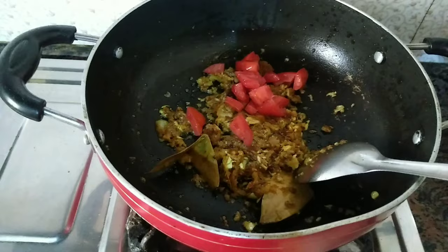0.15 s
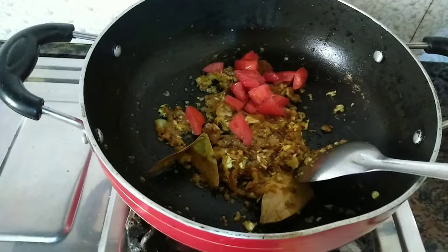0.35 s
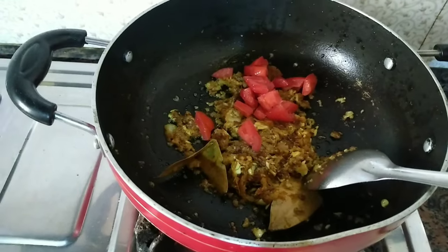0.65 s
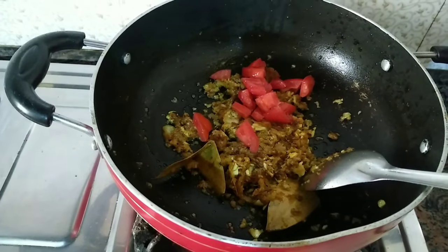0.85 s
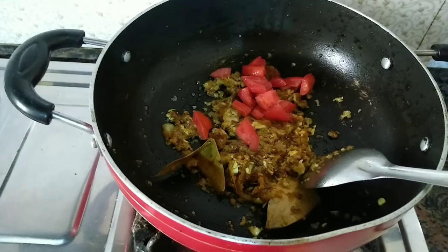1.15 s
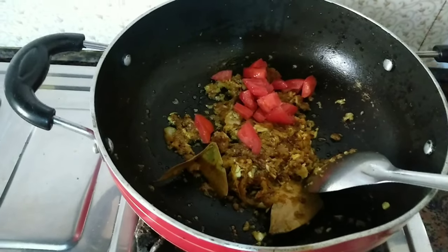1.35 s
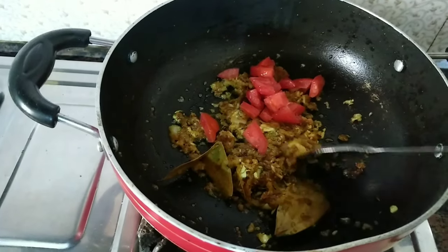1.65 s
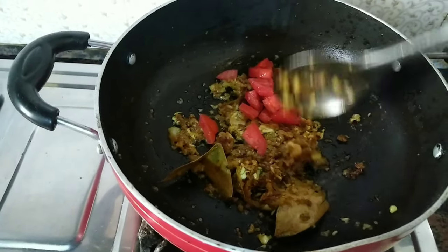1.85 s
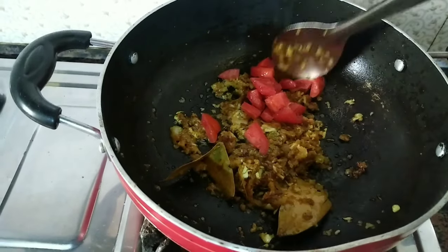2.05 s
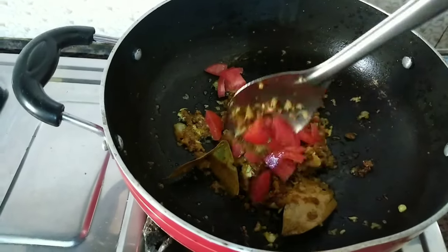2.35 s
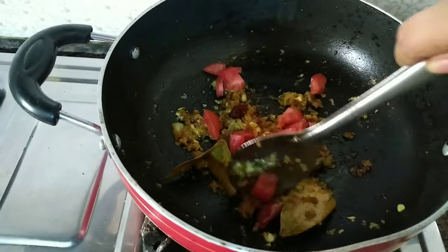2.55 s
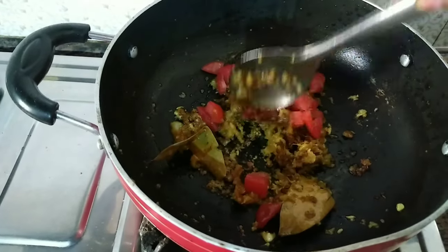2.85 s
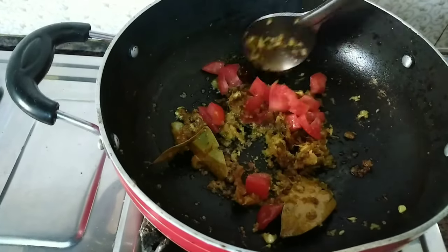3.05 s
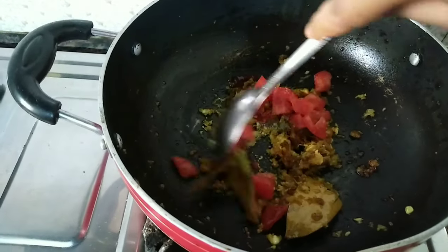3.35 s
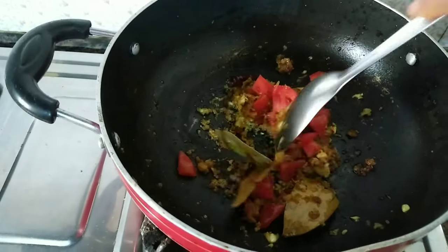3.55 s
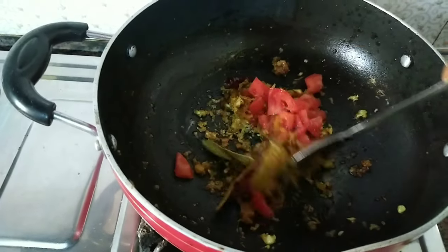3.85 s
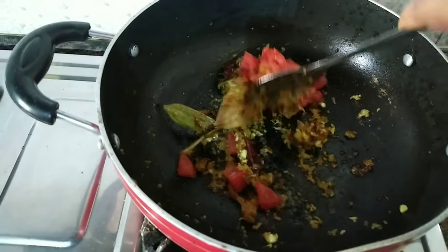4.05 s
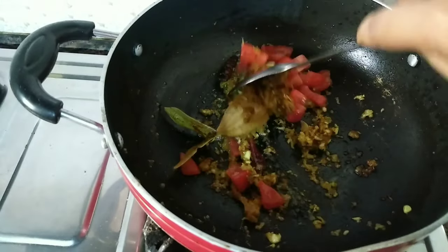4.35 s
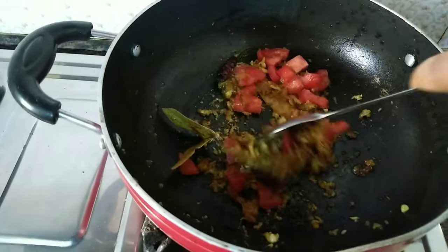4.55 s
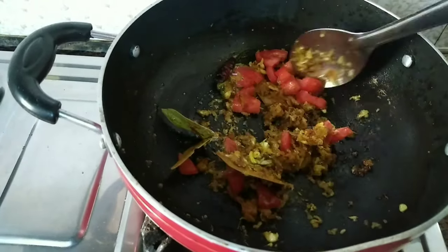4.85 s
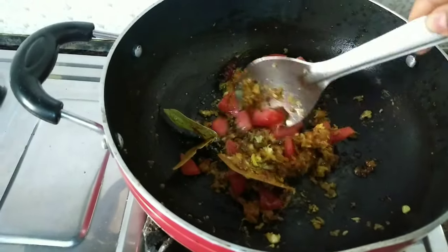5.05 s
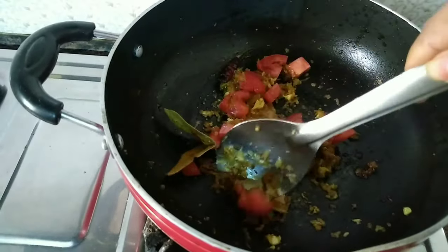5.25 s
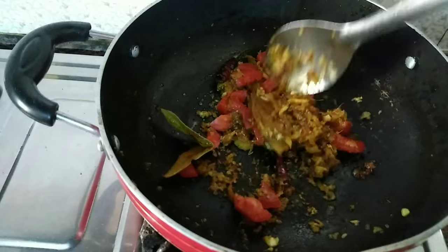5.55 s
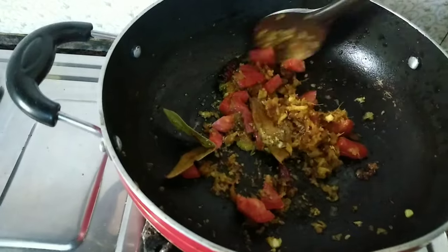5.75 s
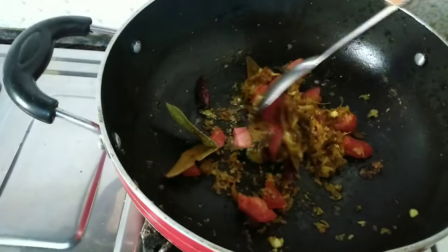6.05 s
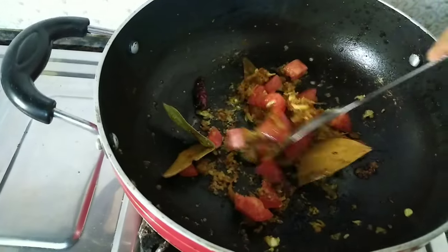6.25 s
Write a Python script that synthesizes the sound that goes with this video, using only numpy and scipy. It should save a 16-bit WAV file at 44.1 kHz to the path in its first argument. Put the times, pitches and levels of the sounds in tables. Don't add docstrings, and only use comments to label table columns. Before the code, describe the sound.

Close phone capture in a small kitchen. A steel spoon knocks a coated pan twice right away, sharp and ringing, over bright open sizzling with fine crackle. A small clink follows, then light scraping and soft pushes into the paste as the sizzle drops to a muffled near-hush. Past four seconds loud oil pops bring the frying back before it fades again. A gas flame roars softly and a fan drones low throughout.

```python
import sys
import numpy as np
from scipy import signal
from scipy.fft import rfft, irfft, next_fast_len
from scipy.io import wavfile
from scipy.ndimage import uniform_filter1d

SR = 44100
rng = np.random.default_rng(int(sys.argv[2]) if len(sys.argv) > 2 else 0)


def file_out(sig):
    cols = np.atleast_2d(sig).T
    lim = np.clip(cols, -1, 1)
    pcm = np.round(lim * 32767).astype(np.int16)
    wavfile.write(sys.argv[1], SR, pcm)


def voltage_ratio(decibels):
    exponent = np.asarray(decibels, float) / 20
    return 10 ** exponent


N = 281799
WAKE_S = 3.35


def evened(x):
    return x / np.sqrt(np.mean(x ** 2) + 1e-20)


def read(points, hz):
    f, value = np.transpose(points)
    return np.interp(np.log(hz + 1), np.log(f + 1), value)


def curve(table, column, t):
    return np.interp(t, np.array(table)[:, 0], np.array(table)[:, column])


def add(mix, s, sound):
    part = mix[round(s * SR):][:len(sound)]
    part += sound[:len(part)]


def coloured(x, colour):
    size = next_fast_len(len(x), True)
    hz = np.fft.rfftfreq(size, 1 / SR)
    inside = (hz > colour[0][0]) & (hz < colour[-1][0])
    return irfft(rfft(x, size) * voltage_ratio(read(colour, hz)) * inside, size)[:len(x)]


def gated(drive, colour, edges, table, patchy_db, size=512):
    overlap = size - size // 4
    hz, t, z = signal.stft(drive, SR, nperseg=size, noverlap=overlap)
    patches = rng.standard_normal(z.shape[::-1]).T
    patches = uniform_filter1d(patches, size=3, axis=0)
    patches = evened(uniform_filter1d(patches, size=24, axis=1))
    gain = np.zeros(z.shape)
    for k, (lo, hi) in enumerate(zip(edges, edges[1:])):
        shape = voltage_ratio(read(colour, hz)) * (hz >= lo) * (hz < hi)
        shape = shape / np.sqrt(np.sum(shape ** 2) / len(hz))
        gain += np.outer(shape, voltage_ratio(curve(table, k + 1, t)))
    z = z * gain * voltage_ratio(patchy_db * patches)
    return signal.istft(z, SR, nperseg=size, noverlap=overlap)[1][:N]


def tick(hz, cycles):
    u = np.arange(200) / SR * hz
    snap = -np.sin(2 * np.pi * u) * u * np.exp(-u / cycles)
    return snap / abs(snap).max()


def bursts(per_s, spread_db, ms):
    puff = np.exp(-np.arange(600) / (ms * SR / 1000))
    out = 0
    for hz in [2000, 3200, 5000, 7500, 11000]:
        strength = voltage_ratio(spread_db * np.minimum(rng.exponential(1, N), 3.2))
        strength = strength * (rng.random(N) < per_s / SR)
        hiss = signal.oaconvolve(strength, puff)[:N] * rng.standard_normal(N)
        out += coloured(hiss, [(hz * .4, -22), (hz * .7, -3), (hz * 1.6, -3), (hz * 3, -22)])
    return evened(out)


def sizzle():
    # (frequency [Hz], density [dB per Hz])
    fry_colour = [(880, -39), (1500, -9), (1560, -3), (1690, -3), (1800, -0.5), (1990, 0.5), (2180, -3.5),
                  (2450, -9.5), (3260, -10.5), (4280, -11.5), (5890, -17.5), (7260, -15), (9600, -22.5),
                  (12500, -54), (21100, -120)]
    jet_colour = [(5470, -30), (9300, 2), (11200, -4.5), (12800, -16), (14700, -7.5), (15700, -12)]
    fry_edges = [1600, 2400, 3000, 3500, 4150, 6100, 9400]
    # (centre [Hz], open [dB], shut [dB], shut once woken [dB], share of opening depth [1])
    fry_bands = [(1980, -41.5, -69.5, -65.5, 0.94), (2700, -48.5, -78, -75.5, 0.94),
                 (3300, -51.5, -84, -78, 0.9), (3800, -51, -87, -80.5, 0.97), (4530, -50.5, -84, -83, 0.98),
                 (7418, -53.5, -85, -79.5, 0.97)]
    jet_bands = [(10280, -61.5, -89, -81.5, 0.9), (13920, -70, -91, -78, 0.81)]
    drive = evened(rng.standard_normal(N) + 0.5 * bursts(per_s=220., spread_db=3.0, ms=0.55))
    fry = gated(drive, fry_colour, fry_edges, suppressor(fry_bands), patchy_db=1.5)
    jet = gated(drive, jet_colour, [9400, 12000, 15700], suppressor(jet_bands), patchy_db=.6)
    return fry + jet


def suppressor(bands):
    # (opens [s], shuts at the pivot [s], later [s per octave], depth [dB], tilt [dB per octave])
    openings = [
        (-.3, 1.015, 0.0084, 0.8, -0.4),
        (.9, 1.503, 0.0066, -2, -0.7),
        (2.059, 2.164, 0.1, -10.5, 2.5),
        (4.268, 5.19, 0.16, -8.5, 1.5),
        (5.193, 6.603, 0.0098, -18.5, 5),
    ]
    # (time [s], depth [dB], tilt [dB per octave])
    jolts = [
        (.11, 5, 4),
        (.31, 18, -5),
        (1.862, -8, -6.5),
        (2.47, -27, 9.5),
        (3.35, -24.5, 0),
        (4.399, 4, 0.8),
    ]
    # (start [s], end [s], from [Hz], to [Hz], change [dB])
    strays = [(0.99, 1.86, 3100, 3500, -4), (1.62, 1.8, 6000, 9000, 3), (3.27, 3.33, 1200, 5200, 5.5),
              (1.646, 2.02, 3550, 5200, 8.5), (1.68, 1.96, 9000, 16000, 10.5), (1.72, 2.03, 900, 2200, 5),
              (3.92, 4.18, 4000, 5200, 8.5), (4.26, 4.95, 1800, 3600, 2.5), (5.68, 6.6, 2500, 3550, -6.5),
              (5.75, 6.3, 3550, 4100, -11), (3.35, 6.6, 3100, 4100, -2), (3.35, 6.6, 4100, 5200, 2),
              (4.55, 4.9, 3550, 4100, 5.5), (2.02, 2.38, 3100, 3550, -7), (2.4, 2.65, 3550, 4100, -3),
              (1.31, 1.39, 1800, 2200, 3), (4.85, 5.1, 1800, 3000, 2), (5.45, 5.7, 1800, 2200, 3.5),
              (5.85, 6.1, 1800, 2200, 3), (4.84, 5.4, 12000, 16000, 3), (4.852, 5.4, 900, 1500, -2.5),
              (2.02, 2.55, 2500, 3500, -2.5), (2.4, 2.54, 4100, 5200, 3), (1.87, 1.94, 6000, 9000, 3),
              (1.69, 1.8, 6000, 9000, 2), (5.52, 5.75, 2500, 4100, -3), (1.52, 1.65, 1800, 3000, 2),
              (1.84, 2.23, 2500, 9000, 5), (4.9, 5.62, 3100, 3500, 3), (5.65, 5.8, 4000, 9000, 2.5),
              (5.75, 6.1, 6000, 9000, -3), (2.3, 2.68, 900, 1500, 3), (4.6, 5.4, 6000, 11500, 1.5),
              (5.85, 6.6, 900, 1500, 1.5)]
    open_s, shut_s, shut_bend, jolt_s = 0.1, 0.2, 1.48, 0.074
    pivot_hz, early_s_per_octave, stray_edge_s = 2000, 0.02, 0.12
    t = np.arange(0, N / SR + .01, .004)[:, None]
    hz, open_db, shut_db, woken_db, share = np.transpose(bands)
    octave = np.maximum(np.log2(hz / pivot_hz), 0)
    shut = np.where(t < WAKE_S, shut_db, woken_db)
    level = shut
    for start, end, later, db, tilt_db in openings:
        before = np.maximum(start - early_s_per_octave * octave - t, 0)
        after = np.maximum(t - end - later * octave, 0)
        wide = np.exp(-before / open_s - (after / shut_s) ** shut_bend)
        target = open_db + share * (db + tilt_db * octave)
        level = np.maximum(level, shut + wide * (target - shut))
    for s, db, tilt_db in jolts:
        wide = (t >= s) * np.exp(-np.maximum(t - s, 0) / jolt_s)
        target = open_db + share * (db + tilt_db * octave)
        level = np.maximum(level, shut + wide * (target - shut))
    for start, end, lo_hz, hi_hz, db in strays:
        on = np.clip(np.minimum(t - start, end - t) / stray_edge_s + .5, 0, 1)
        level = level + db * on * (hz > lo_hz) * (hz < hi_hz)
    return np.hstack([t, level])


def spoon():
    # (time [s], peak [dB], ring [dB], which ring [index], pan tail [dB])
    contacts = [(.1084, -1, -15, 0, -14), (.1361, -7, -17, 0, -16), (.1488, -7, -19, 0, -14),
                (.160, -15, -22, 0, -9), (.186, -22, -20, 0, -12), (.3087, -4.5, -30, 1, -20),
                (.3124, -1.5, -17, 1, -17), (.3157, -5, -40, 1, -18), (.319, -8, -40, 1, -16),
                (.3212, -8, -40, 1, -13), (.8245, -26, -14, 2, -12), (.8261, -18, -13, 2, -15)]
    # (frequency [Hz], level [dB], t60 [s])
    ring_modes = [
        [(6137, -14, .04), (8064, -15, .07), (10150, 1, .011), (10230, -24, .1), (14140, -15, .016)],
        [(1475, -16, .17), (1906, -10, .2), (2503, -3, .18), (3106, -9, .15), (3618, -9, .18), (3962, -10, .2),
         (4004, -6.5, .33), (6253, -18, .3), (6262, -18, .3), (8134, -13, .1), (10560, -9, .13),
         (10640, -21, .18), (12200, -24, .06), (14200, -19, .075), (14290, -21, .075)],
        [(1850, 3, .05), (4549, -3, .03), (7000, 0, .035), (8592, -15, .1), (11210, -16, .05),
         (12880, -10, .045), (14750, -7, .06)],
    ]
    # (frequency [Hz], density [dB per Hz])
    pan_colour = [(530, -40), (900, -9), (1210, -12.5), (2000, 5), (3530, 0.5), (5720, -14.5), (6300, -18),
                  (6810, -36.5), (8250, -25), (9000, -40), (11700, -69.5), (19800, -120)]
    bowl_modes = [1840, 2035, 2105, 2247, 2326, 2510, 2647, 2774, 2817, 3143, 3339, 3709, 4290]
    # (delay [s], level [dB])
    echoes = [
        (0, 0),
        (.0007, -11),
        (.0020, -4),
        (.0029, -6),
        (.0047, -12),
        (.0072, -13),
    ]
    snap_pitch = [3300, 3100, 6200]
    out, t = np.zeros(N), np.arange(SR // 2) / SR
    bowl_hz = np.array(bowl_modes)[:, None]
    for s, db, ring_db, which, tail_db in contacts:
        which = round(which)
        first = min(row[0] for row in contacts if round(row[3]) == which)
        bounce = s - first > .005
        dull, cycles, bounce_echo_db = (.95, .5, -3) if bounce else (1, .4, 0)
        snap = tick(dull * snap_pitch[which], cycles)
        for delay, echo_db in echoes:
            add(out, s + delay, voltage_ratio(db + echo_db + 1 + bounce_echo_db * (delay > 0)) * snap)
        decay = voltage_ratio(-60 * t / 0.026) + voltage_ratio(-14.0 - 60 * t / 0.71)
        rattle = evened(coloured(rng.standard_normal(len(t)), pan_colour)) * decay
        turns = bowl_hz * t + rng.random(bowl_hz.shape)
        modes = np.sum(voltage_ratio(read(pan_colour, bowl_hz) * .7) * np.sin(2 * np.pi * turns), 0)
        modes = evened(modes) * voltage_ratio(-6.5 - 60 * t / 0.2)
        ring = sum(voltage_ratio(mode_db - 60 * t / t60) * np.sin(2 * np.pi * hz * t)
                   for hz, mode_db, t60 in ring_modes[which])
        add(out, s, voltage_ratio(db + tail_db + .3) * (rattle + modes) * np.minimum(t / .002, 1))
        add(out, s, voltage_ratio(db + ring_db) * ring * np.minimum(t / .0008, 1))
    return out


def pops():
    # (time [s], peak [dB], centre [Hz], tail [dB])
    oil_pops = [(0.0393, -20, 2700, -8), (0.041, -34, 8500, 4), (1.457, -39, 2625, -10),
                (1.862, -30, 2720, -8.5), (3.3498, -43.5, 3600, -10), (3.12, -45, 902, -10),
                (4.134, -37, 900, -7), (4.3166, -19.5, 2480, -9.5), (4.377, -27, 2300, -5),
                (4.399, -17.5, 2780, -13), (5.2598, -38, 2680, -13), (6.3094, -48, 4410, -5),
                (0.205, -24, 7150, -11), (0.529, -24, 4550, -8), (0.559, -30, 7000, -8),
                 (0.858, -24, 4940, -2), (0.9088, -34, 7800, -3), (0.9212, -35, 4740, -2),
                 (0.936, -23.5, 4820, -10), (1.489, -24, 4415, -23), (1.6318, -39, 7020, -14),
                 (1.9144, -44, 4730, 0), (1.9765, -34, 4730, -19), (2.0213, -34, 5340, -13),
                 (2.0485, -33.5, 6400, -2), (2.0901, -39, 8150, -11), (2.1425, -41, 4520, 2),
                 (2.4704, -47, 6500, 0), (2.552, -52, 5120, -8), (2.6042, -54, 4400, -9),
                 (2.6233, -55, 4400, -10), (2.666, -55, 4400, -8), (2.996, -48, 4800, -5),
                 (3.1764, -55.5, 7010, -17), (3.7593, -56.5, 4750, -9), (3.8212, -61.5, 4910, -2.5),
                 (4.045, -47, 4500, -22), (4.4607, -30, 6760, -19), (5.3428, -59, 4790, -10),
                 (5.4994, -45, 4450, -12), (5.7354, -39, 4690, -22), (5.918, -44, 5300, -9),
                (.4966, -41, 7400, -6), (.6757, -36, 6500, -8), (1.0349, -35, 7060, -6),
                     (1.0698, -33, 7000, -6), (1.1272, -37, 7500, -6), (1.1666, -36, 7000, -6),
                     (1.198, -40, 7500, -2), (1.2948, -36, 8000, -2), (1.338, -37, 7000, -4),
                     (1.3706, -38, 8200, -5), (1.4604, -38, 7000, -6), (4.6902, -36, 3600, -6),
                     (4.7196, -36, 3000, -5), (4.9441, -36, 4760, -8), (5.8391, -46, 5200, -8),
                     (5.9468, -48, 4800, -10), (6.1114, -51, 5540, -8)]
    out, t = np.zeros(N), np.arange(2048) / SR
    for s, db, hz, tail_db in oil_pops:
        colour = [(hz * .3, -30), (hz * .62, -6), (hz, 0), (hz * 1.6, -6), (hz * 4.5, -32)]
        spray = evened(coloured(rng.standard_normal(len(t)), colour))
        add(out, s + .0011, voltage_ratio(db) * tick(hz * .85, cycles=.3))
        add(out, s, voltage_ratio(db + tail_db - 60 * t / .022) * spray * np.minimum(t / .001, 1))
    return out


def slides():
    # (start [s], length [s], centre [Hz], width [Hz], level [dB])
    strokes = [
        (1.45, .11, 4400, 250, -47),
        (1.49, .08, 3200, 150, -49),
        (2.11, .16, 2050, 150, -53),
        (2.02, .14, 7000, 900, -53),
    ]
    out = np.zeros(N)
    for s, length, hz, width, db in strokes:
        colour = [(hz - 2 * width, -20), (hz, 0), (hz + 2 * width, -20)]
        hiss = evened(coloured(rng.standard_normal(SR // 2), colour))
        count = round(length * SR)
        add(out, s, voltage_ratio(db) * hiss[:count] * np.hanning(count))
    return out


def thuds():
    # (time [s], peak [dB], frequency [Hz])
    pushes = [
        (2.466, -26, 368.6),
        (2.548, -27.5, 339),
        (3.119, -38, 280),
        (4.134, -36.5, 341),
        (2.065, -30, 63.3),
        (2.67, -34, 50),
    ]
    out, t = np.zeros(N), np.arange(SR // 4) / SR
    for s, db, hz in pushes:
        t60 = 0.042 + 8.6 / hz
        add(out, s, voltage_ratio(db - 60 * t / t60) * np.sin(2 * np.pi * hz * t) * np.minimum(t / 0.0038, 1))
        add(out, s, voltage_ratio(db - 11.0) * (hz > 200) * tick(hz=730, cycles=0.62))
    return out


def flame():
    # (frequency [Hz], density [dB per Hz])
    roar_colour = [(100, -31), (170, 1.5), (195, -2.5), (248, -11), (312, 2), (405, -2.5), (459, -9),
                   (540, -6.5), (750, -8), (841, -13.5), (910, -4.5), (985, -0.5), (1080, -10.5),
                   (1170, -18), (1260, -12), (1570, -16.5), (1700, -3.5), (2210, -40), (3740, -120)]
    roar_edges = [180, 860, 1080, 1600]
    # (time [s], level [dB])
    strength = [(0.0, -39.5), (.14, -46), (.73, -43), (1.37, -43), (1.53, -40.5), (1.76, -44),
                (2.17, -41.5), (2.47, -44), (2.94, -48.5), (3.4, -44.5), (4.13, -44.5), (4.34, -42),
                (4.5, -42.5), (5.2, -43), (6.39, -43.5)]
    # (centre [Hz], open [dB], shut [dB], shut once woken [dB], share of opening depth [1])
    top_bands = [(960, -52.5, -65, -60, 0.23), (1300, -54, -67, -64, .45)]
    # (peak time [s], level [dB])
    hums = [
        (.28, -41.5),
        (2.17, -53.5),
        (3.4, -58.5),
        (4.45, -45),
        (4.65, -46.5),
        (6.39, -51),
    ]
    rise_db_per_s, fall_db_per_s = 64.5, 41
    t, bowl_db, edge_db = suppressor(top_bands).T
    for s, db in hums:
        drop_db = np.maximum(rise_db_per_s * (s - t), fall_db_per_s * (t - s))
        bowl_db = np.maximum(bowl_db, db - drop_db)
    levels = np.transpose([t, curve(strength, 1, t), bowl_db, edge_db])
    return gated(rng.standard_normal(N), roar_colour, roar_edges, levels, patchy_db=1.25, size=2048)


def slow_wander():
    return evened(uniform_filter1d(uniform_filter1d(rng.standard_normal(N), size=1500), size=1500))


def drone():
    # (start [s], length [s], level [dB], pitch [Hz])
    fan_swells = [(-0.002, 0.26, -32.5, 101.4), (0.33, 0.22, -34, 101.5), (0.647, 0.11, -35.5, 100),
                  (0.964, 0.3, -36, 101.8), (1.298, 0.42, -34, 104.9), (1.83, 0.039, -37, 105.8),
                  (1.93, 0.042, -35, 101.8), (2.03, 0.028, -38, 103.9), (2.087, 0.2296, -34.5, 102),
                  (2.426, 0.471, -33, 105.7), (2.89, 0.15, -34.5, 101.7), (3.081, 0.032, -40.5, 115.9),
                  (3.158, 0.032, -39.5, 101.2), (3.23, 0.12, -32.5, 103.6), (3.501, 0.048, -36.5, 101.5),
                  (3.625, 0.056, -36.5, 102.7), (3.893, 0.084, -39, 102.5), (4.06, 0.084, -35.5, 99.67),
                  (4.187, 0.14, -34.5, 102.1), (4.348, 0.032, -35.5, 99.45), (4.617, 0.056, -38, 101.7),
                  (4.924, 0.066, -35.5, 104.4), (5.236, 0.146, -34, 103.9), (5.431, 0.19, -35, 103.8),
                  (5.641, 0.13, -34, 105.8), (6.11, 0.134, -36.5, 100.5), (6.333, 0.048, -35, 98.3),
                  (.88, 0.062, -42, 99.8),
        (1.235, 0.036, -42.5, 112.3),
        (5.8, 0.058, -40.5, 105.8),
        (5.97, 0.074, -40.5, 104.4),
    ]
    # (frequency [Hz], level [dB])
    rumble_colour = [(20, -32.5), (35, -25), (50, -17.5), (70, -3.5), (85, -3), (110, 5.5), (130, -1),
                     (165, -1.5), (185, -17.5)]
    edge_db_per_s, arch_db, lull_db = 258, 5, -56.5
    t = np.arange(N) / SR
    level_db, hz = np.full(N, lull_db), np.full(N, 102.)
    for s, length, db, swell_hz in fan_swells:
        off = abs(t - s - length / 2)
        arch = arch_db * np.minimum(2 * off / length, 1) ** 2
        edge = edge_db_per_s * np.maximum(off - length / 2, 0)
        swell_db = db + 0.45 - arch - edge
        hz = np.where(swell_db > level_db, swell_hz, hz)
        level_db = np.maximum(level_db, swell_db)
    wobble, flutter = slow_wander(), slow_wander()
    pitch = uniform_filter1d(hz, size=900) + 5.0 * wobble
    tone = np.sqrt(2) * np.sin(2 * np.pi * np.cumsum(pitch) / SR)
    rumble = evened(coloured(rng.standard_normal(N), rumble_colour))
    level_db = uniform_filter1d(level_db, size=400)
    rumble_floor_db = np.where(t < WAKE_S, -41.5, -47)
    rumble_db = np.maximum(level_db - 3.5, rumble_floor_db)
    return voltage_ratio(level_db + 0.98 * flutter) * tone + voltage_ratio(rumble_db) * rumble


def scene():
    events = coloured(spoon() + pops(), [(500, -24), (1100, -10), (1500, -5), (1900, 0), (9000, -1),
                                         (12500, -8), (22000, -9)])
    return (sizzle() + flame() + drone() + slides() + thuds() + events)[None]


def top_cut(x):
    return signal.sosfilt(signal.butter(12, 16620, fs=SR, output="sos"), x)


def record(dry):
    low_pass = signal.firwin(255, 15500, window=("kaiser", 8), fs=SR)
    limited = signal.oaconvolve(dry, low_pass[None], "same")
    return top_cut(limited)


dry = scene()
out = record(dry)
file_out(out)
```